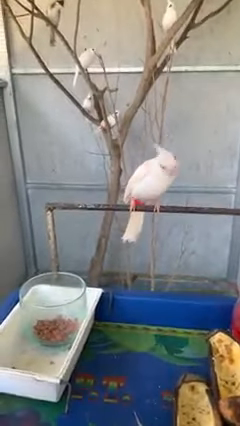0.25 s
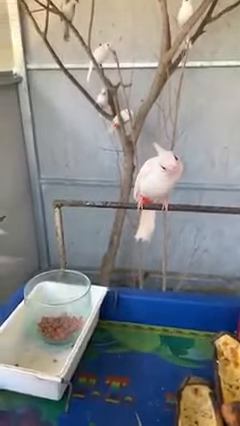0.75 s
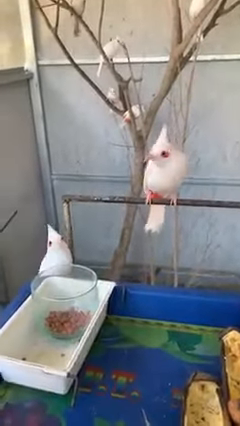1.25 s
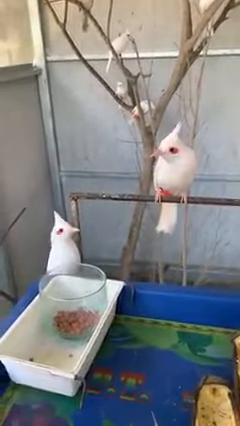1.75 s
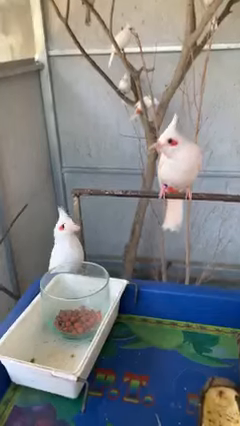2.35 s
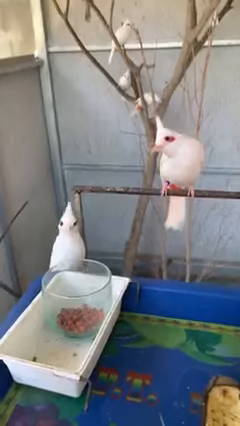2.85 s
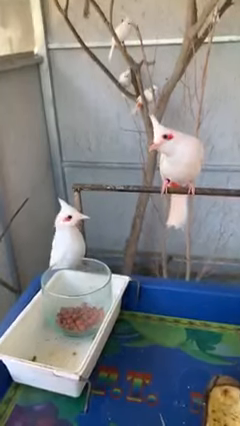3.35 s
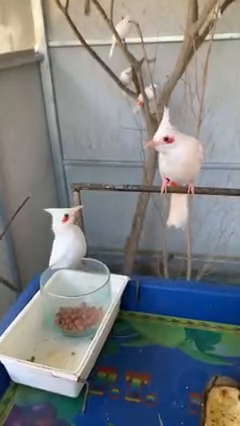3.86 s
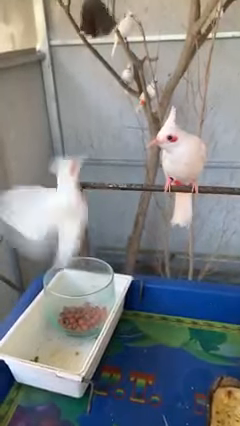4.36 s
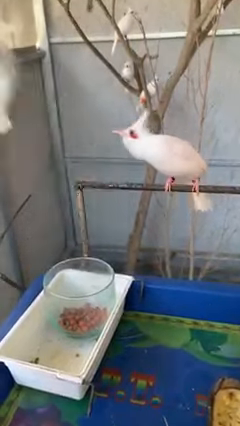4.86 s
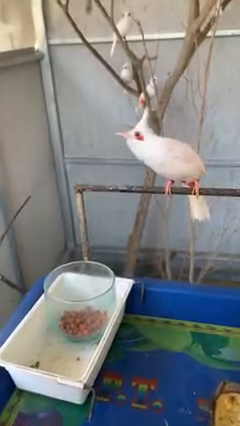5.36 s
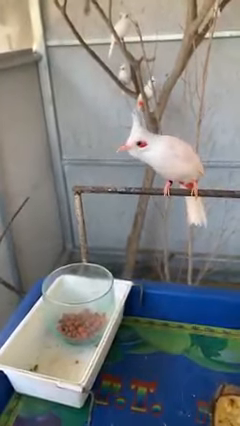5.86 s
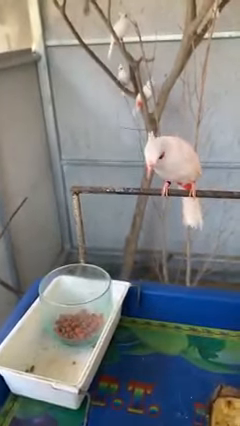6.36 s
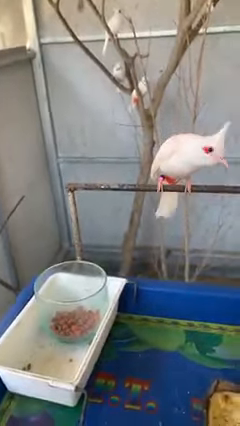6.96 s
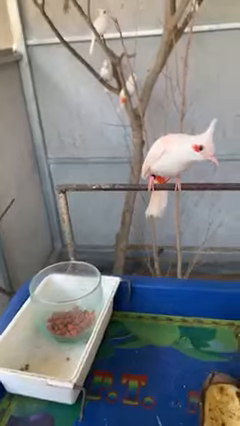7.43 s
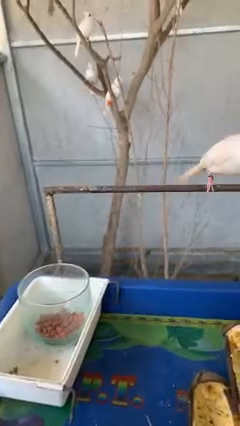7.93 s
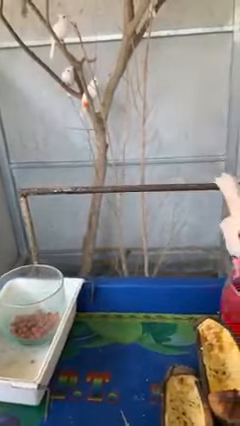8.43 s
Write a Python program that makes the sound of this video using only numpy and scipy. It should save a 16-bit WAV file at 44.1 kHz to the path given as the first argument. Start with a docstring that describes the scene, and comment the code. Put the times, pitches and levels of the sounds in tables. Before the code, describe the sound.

Close to the microphone in a small aviary, songbirds trade short gliding whistles, hoarse chirps and brief scolding runs over fainter flock chatter. A sharp, buzzy call cuts through near the start, and the loudest ones come just past halfway. Soft feather rustles come and go, and a few quick taps on a dish arrive at the end. The walls add a brief echo, with low outside rumble and hand noise underneath.

```python
"""Bulbuls chirp, rasp and chatter in a small hard-walled aviary, close to a pair of microphones.
Each note is a gliding whistle, roughened by fast modulation of its frequency and amplitude;
reflection from the walls returns it as a short bright ring. Feathers rustle, a bird taps the dishes
near the end, and low rumble comes from outside and from the hand that holds the recorder."""
import sys
import numpy as np
from scipy import signal
from scipy.fft import rfft, irfft, next_fast_len
from scipy.io import wavfile
from scipy.ndimage import uniform_filter1d

SR = 44100
rng = np.random.default_rng(int(sys.argv[2]) if len(sys.argv) > 2 else 0)


def waveform_to_disk(signal):
    """Save audio, clipped to [-1, 1], as 16-bit WAV at the path in sys.argv[1]."""
    frames = np.transpose(np.atleast_2d(signal))
    scaled = np.clip(frames, -1, 1) * 32767
    samples = np.round(scaled).astype(np.int16)
    wavfile.write(sys.argv[1], SR, samples)


N = 383229

# Loud buzzing calls, one list each. Each row: time in seconds, pitch in Hz, level in dB, buzz 0 to 1.
LOUD_CALLS = [
    [(1.071, 3125, -40.5, 1), (1.085, 3250, -28.5, 1), (1.089, 3490, -13, 1), (1.127, 3636, -14, 1),
     (1.132, 3700, -20, 0.9), (1.158, 3960, -21.5, 1), (1.178, 3630, -49, 0.7)],
    [(4.79, 3040, -48, 0.85), (4.804, 3220, -28, 0.55), (4.811, 3467, -13, 0.99), (4.832, 3640, -8.5, 0.77),
     (4.837, 3765, -21, 0.5), (4.878, 4160, -26.5, 1), (4.892, 3800, -45, 1)],
    [(5.526, 3132, -39, 1), (5.548, 3340, -21, 0.9), (5.586, 3575, -19, 0.74), (5.608, 3850, -19, 1),
     (5.635, 3840, -25, 0.8)],
    [(5.61, 3260, -33.5, 1), (5.633, 3400, -16, 1), (5.65, 3186, -16.5, 0.74), (5.678, 3540, -15.5, 1),
     (5.695, 3896, -21, 1), (5.722, 4090, -31, 0.9)],
    [(7.415, 3120, -32.5, 1), (7.427, 3378, -28, 0.93), (7.445, 3505, -24, 0.98), (7.475, 3140, -25, 0.6),
     (7.51, 2895, -21.5, 0.3), (7.535, 2846, -21.5, 0.2), (7.548, 2860, -33, 0.1)],
    [(7.568, 2843, -34, 0.94), (7.582, 2956, -33, 1), (7.605, 3407, -30.5, 0.92), (7.64, 2903, -33, 0.6),
     (7.666, 2720, -47, 0.4)],
]
# Overtones against effort. Each row: call level, second harmonic, third harmonic, all in dB.
CALL_OVERTONES = [(-28.5, -27.5, -34), (-28, -25, -31), (-9.5, -23.5, -17)]
# A falling note, then a pure held one. Each row: start in seconds, upper and held pitch in Hz,
# held length in seconds, upper and held level in dB.
TEE_OO_CALLS = [(2.49, 2856, 2590, 0.07, -38, -43.5), (3.121, 2910, 2553, 0.037, -35.5, -34.5),
                (3.436, 2860, 2550, 0.044, -30.5, -38.5), (3.87, 2913, 2640, 0.046, -31, -35),
                (5.42, 2776, 2584, 0.02, -35, -35), (6.352, 3270, 2910, 0.014, -38, -30.5)]
# Burry whistles with a low grace note. Each row: start and length in seconds, pitch in Hz, level in dB.
TO_WEE_CALLS = [(3.541, 0.055, 2184, -41.5), (3.983, 0.056, 2255, -42.5), (6, 0.11, 2350, -32.5)]
# Clear whistles and harsh rasps. Each row: start and length in seconds, pitch in Hz, level in dB.
WHISTLE_NOTES = [(0.229, 0.17, 3043, -57), (1.164, 0.07, 2490, -39.5), (1.385, 0.064, 3580, -42.5),
                 (1.461, 0.039, 3514, -42.5), (2.003, 0.035, 3290, -45), (2.097, 0.033, 4010, -39),
                 (2.181, 0.03, 3950, -40.5), (2.75, 0.053, 2070, -42.5), (2.929, 0.026, 3320, -34.5),
                 (2.946, 0.026, 2690, -38.5), (3.271, 0.077, 2170, -43.5), (3.29, 0.035, 3465, -47.5),
                 (3.349, 0.042, 2910, -38), (3.38, 0.0586, 1763, -43), (3.698, 0.069, 2144, -44.5),
                 (3.819, 0.045, 1706, -40.5), (4.134, 0.077, 2425, -43), (4.146, 0.033, 2063, -39.5),
                 (4.291, 0.034, 1717, -42), (4.702, 0.16, 3650, -44), (5.003, 0.076, 2401, -36.5),
                 (5.053, 0.05, 3280, -33), (5.234, 0.089, 2328, -42), (5.456, 0.06, 2132, -41.5),
                 (5.762, 0.051, 2900, -32), (5.797, 0.026, 2888, -24.5), (6.242, 0.036, 2260, -40),
                 (6.393, .026, 2710, -38), (6.441, 0.027, 3340, -35), (6.425, 0.038, 3930, -40.5),
                 (6.994, .036, 2863, -26), (7.103, 0.07, 2230, -41.5), (7.548, 0.023, 2796, -28.5),
                 (8.055, 0.019, 2146, -37.5), (8.076, 0.022, 2187, -30.5), (8.6, 0.036, 2683, -37),
                 (8.654, 0.026, 2130, -41.5)]
RASP_NOTES = [(0.388, 0.17, 1910, -59.5), (1.547, 0.046, 3114, -38), (1.643, 0.034, 2733, -40),
              (1.713, 0.086, 3270, -42), (1.835, 0.059, 3390, -40.5), (1.96, 0.046, 3360, -40.5),
              (2.094, 0.071, 2847, -46), (5.813, 0.0402, 2947, -31.5), (6.039, 0.17, 2888, -44.5)]
# Slurs. Each row: start and length in seconds, middle pitch in Hz, level in dB, rasp 0 to 1.
RISING_SLURS = [(0.55, 0.048, 3310, -36, 0.64), (0.667, 0.055, 2735, -35.5, 0.51),
                (2.314, 0.043, 3480, -39, 0.91), (2.613, 0.042, 1705, -47, 0.39),
                (2.642, 0.018, 2940, -34.5, 0.83), (3.129, .035, 1745, -53, .6),
                (3.227, 0.072, 2890, -37.5, 0.25), (3.708, 0.037, 3220, -38.5, 0.62),
                (3.907, 0.058, 3640, -44, 0.95), (4.168, 0.035, 3200, -37.5, 0.29),
                (4.476, 0.013, 3080, -27.5, 0.28), (4.616, 0.11, 2237, -44, 0.81),
                (4.689, 0.026, 2930, -32.5, 0.22), (6.027, 0.058, 3125, -35, 0.19),
                (5.717, 0.078, 1810, -47, 0.2), (5.856, 0.037, 2550, -30, 0.39),
                (8.507, 0.043, 1245, -46, 0.29), (8.543, 0.086, 1600, -42.5, 0.55)]
FALLING_SLURS = [(0.716, 0.061, 3190, -40.5, 0.31), (1.236, 0.099, 2540, -44.5, 0.79),
                 (2.785, .07, 3090, -30, 0.53), (2.858, 0.069, 2388, -39.5, 0.33),
                 (3.293, 0.052, 2960, -39.5, 0.15), (1.567, 0.081, 2500, -45.5, .5),
                 (3.683, 0.052, 2430, -40.5, 0.71), (4.271, 0.066, 2274, -46.5, 0.58),
                 (6.11, 0.081, 1988, -37.5, 0.41), (6.563, 0.063, 1928, -45, 0.5),
                 (6.719, 0.06, 2910, -38, 0.62), (6.817, 0.052, 3205, -34, 0.39)]
# Scolding runs. Each row: start and syllable spacing in seconds, top pitch in Hz, level in dB.
CHATTER_RUNS = [(2.172, 0.044, 1691, -41), (4.331, 0.047, 1637, -42), (6.612, .047, 1695, -39.5)]
# Pitch contours. Each pair: start and end pitch as shares of the middle pitch.
STEADY, LIFT, DROOP = (1, 1), (.95, 1.015), (1, .98)
RISE, FALL, ARCH = (.83, 1.1), (1.09, .9), (.74, .77)
# Impacts of beak, feet and wings. Each row: start in seconds, ring level in dB, ring frequency in Hz,
# time to decay by 60 dB in seconds, click level in dB.
IMPACTS = [(1.047, -36, 410, 0.019, -77), (3.439, -49, 10480, 0.048, -70), (4.795, -44, 156, 0.2, -108),
           (6.152, -40.5, 490, 0.02, -99), (7.677, -39.5, 338, 0.035, -76), (8.379, -38, 10820, 0.075, -41),
           (8.417, -23.5, 3920, 0.025, -28.5), (8.46, -35, 1350, 0.023, -41.5),
           (8.481, -40, 1600, 0.019, -64)]
# Bouts of rustling and of hand rumble. Each row: start and length in seconds, level in dB.
RUSTLE_BOUTS = [(0.17, 0.11, -61), (0.382, 0.22, -54), (0.56, 0.27, -50), (2.99, 0.27, -60.5),
                (3.684, 0.42, -57.5), (3.947, 0.37, -56), (4.225, 0.28, -56), (4.712, 0.13, -50.5),
                (4.976, 0.23, -56), (5.223, 0.17, -51.5), (6.08, 0.17, -58), (6.7, 0.24, -66),
                (7.812, 0.071, -59)]
HAND_BOUTS = [(0, 0.12, -43), (0.536, 0.3, -48), (1.2, 0.33, -44.5), (3.79, 0.45, -49), (4.684, 0.25, -47),
              (7.45, 0.81, -54.5)]
# Strength of the flock's notes and the outside rumble. Each row: time in seconds, level in dB.
FLOCK_LEVELS = [(0, -80), (.4, -57), (.8, -58.5), (1.0, -69), (1.6, -55.5), (4.6, -57.5), (4.95, -54.5),
                (5.5, -53.5), (7.3, -54.5), (8.0, -57.5), (8.69, -63)]
RUMBLE_LEVELS = [(0.0, -48), (3.73, -49.5), (3.92, -47), (5.64, -51), (8.69, -47.5)]
# Tone colour of the birds' calls as the microphones hear them. Each row: frequency in Hz, gain in dB.
CALL_COLOUR = [(900, -1), (1400, 5.5), (3800, -2.5), (4400, -9.5), (5200, 0.5), (5800, -3.5), (8500, -15),
               (10000, -4), (11500, -7.5), (13000, -11.5), (16000, -14.5)]
# Resonance of the wide-open beak in loud calls. Each row: frequency in Hz, gain in dB.
OPEN_BEAK_RESPONSE = [(7500, 1), (10000, -1), (11200, 2.5), (12200, 2), (14000, 2)]
# Noise spectra. Each row: frequency in Hz, gain in dB.
FEATHER_SPECTRUM = [(700, -1), (2000, 6.5), (4500, -3.5), (6700, 11.5), (8300, 2.5), (10000, 7.5),
                    (12700, 1), (16000, -3.5)]
RUMBLE_SPECTRUM = [(22, -43), (50, 2), (140, -5.5), (330, -16.5), (570, -20.5), (820, -26.5), (1500, -26.5),
                   (3200, -38.5), (4600, -43), (6500, -42), (8500, -50), (10500, -50.5), (14500, -71.5)]
HAND_SPECTRUM = [(20, -27.5), (45, 4.5), (110, -7.5), (300, -16.5), (800, -44), (3000, -76)]
# Reverberation of the aviary. Each row: frequency in Hz, time to decay by 60 dB in seconds.
REVERB_TIMES = [(300, 0.19), (1500, 0.37), (3000, 0.36), (4200, 0.33), (10000, 0.26)]
# Response to the sum and the difference of left and right. Each row: frequency in Hz, gain in dB.
MID_RESPONSE = [(3900, 0), (4300, -8), (4650, -26.5), (5150, -14.5), (5700, 2.5), (6500, 3), (11500, 4),
                (12700, -14), (13700, 4)]
SIDE_RESPONSE = [(60, -1.5), (400, -0.5), (1300, -10), (2500, 4), (3600, -1), (4500, 6.5), (5600, 2),
                 (6700, -21.5), (8000, -7.5), (12600, 3), (14000, -21.5)]


def loud_calls(buzz_hz=235, depth=.79, swing_hz=280, grit_hz=200, under_db=-6, under_s=.011):
    """Modulation splits each sweep into fast pulses; greater effort strengthens the third harmonic."""
    beat = phase_of(buzz_hz * (1 + .26 * wander(200)))
    grit, hiss, out = wander(700), gain_of(-28) * turbulence(), np.zeros(N)
    effort_db, second_db, third_db = np.transpose(CALL_OVERTONES)
    for call in LOUD_CALLS:
        s, *controls = np.transpose(call)
        at = np.arange(int(s[0] * SR), int(s[-1] * SR))
        t = np.arange(len(at)) / SR
        hz, db, buzz = [np.interp(at / SR, s, control) for control in controls]
        phase = phase_of(hz + buzz * (swing_hz * np.sin(beat[at]) + grit_hz * grit[at]))
        second = gain_of(np.interp(db, effort_db, second_db)) * np.sin(2 * phase)
        third = gain_of(np.interp(db, effort_db, third_db)) * np.sin(3 * phase)
        lower_voice = gain_of(under_db) * np.exp(-t / under_s) * np.sin(phase * 2 / 3)
        voice = np.sin(phase) + second + buzz * (third + lower_voice + hiss[at])
        edges = np.minimum(np.minimum(t, t[-1] - t) / .004, 1)
        pulses = edges * np.exp(depth * buzz * np.cos(beat[at]))
        add(out, s[0], gain_of(db) * pulses * voice)
    echo = filtered(out, [(1, -8.5)], lag_s=.0041)  # from the wall behind the perch
    return filtered(filtered(out + echo, CALL_COLOUR), OPEN_BEAK_RESPONSE)


def syrinx(t, pitch, db, rasp, flutter, grit, air, swing_hz=300, grit_hz=230):
    """Flutter modulates a whistle, adding rough sidebands; low, raspy and loud notes are richer."""
    phase = phase_of(pitch + rasp * (swing_hz * flutter + grit_hz * grit))
    harsh = min(rasp, 1)
    tremolo = np.exp(.65 * harsh * flutter)
    attack_s = min(.022, .6 * t[-1]) + .1 * harsh * t[-1]
    ramp = np.clip(np.minimum(t / attack_s, (t[-1] - t) / .005), 0, 1)
    swell = np.sin(np.pi / 2 * ramp) ** 2
    second = gain_of(np.interp(pitch, [1700, 2200], [-6, -39 + 23 * harsh])) * np.sin(2 * phase)
    third = gain_of(np.interp(db, [-30, -15], [-39, -21])) * np.sin(3 * phase)
    subharmonic = gain_of(-21) * harsh ** 3 * np.interp(pitch, [2400, 2900], [0, 1]) * np.sin(phase / 2)
    hiss = gain_of(-21) * harsh * air
    return unit_rms(swell * tremolo * (np.sin(phase) + swell * (subharmonic + second + third) + hiss))


def turbulence():
    """Turbulent flow in the beak makes a treble hiss."""
    return unit_rms(filtered(rng.standard_normal(N), [(3000, -22.5), (6000, 5), (9000, 11.5), (15000, -3)]))


def short_notes(flutter_hz=200):
    """Level is a cue to distance: louder notes sound closer and drier, soft ones distant."""
    flutter = np.sin(phase_of(flutter_hz * (1 + .25 * wander(250))))
    grit, air = wander(1500), turbulence()
    near, far = np.zeros((2, N))
    for s, length, contour_hz, db, rasp in two_note_calls() + single_notes() + chatter() + flock():
        t = np.arange(int(length * SR)) / SR
        at = (round(s * SR) + np.arange(len(t))) % N
        pitch = np.polyval(np.polyfit([0, .5, 1], contour_hz, 2), t / t[-1])
        note = gain_of(db) * syrinx(t, pitch, db, rasp, flutter[at], grit[at], air[at])
        closeness = np.interp(db, [-30, -17], [.12, .93])
        add(near, s, np.sqrt(closeness) * note)
        add(far, s, np.sqrt(1 - closeness) * note)
    far = filtered(far, [(7000, .5), (10000, -12)])  # high overtones beam forward, missing the walls
    return filtered(near, CALL_COLOUR), filtered(far, CALL_COLOUR)


def glide(s, length, hz, db, rasp, bend):
    """A note's frequency glides through three pitches: start, middle and end."""
    return s, length, (bend[0] * hz, hz, bend[1] * hz), db, rasp


def two_note_calls(tee_s=.0239, grace_s=.0308, grace_hz=1687):
    """Two tones in quick succession form an interval: down in "tee-oo", up in "to-wee"."""
    notes = []
    for s, tee_hz, oo_hz, length, tee_db, oo_db in TEE_OO_CALLS:
        notes.append(glide(s, tee_s, tee_hz, tee_db, rasp=.27, bend=DROOP))
        notes.append(glide(s + .024, length, oo_hz, oo_db, rasp=.037, bend=STEADY))
    for s, length, hz, db in TO_WEE_CALLS:
        notes.append(glide(s, grace_s, grace_hz, db - 6, rasp=.43, bend=RISE))
        notes.append(glide(s + .0073, length, hz, db, rasp=.43, bend=LIFT))
    return notes


def single_notes():
    """Modulation depth and contour set whistles, slurs and rasps apart; strong whistles are purest."""
    notes = [glide(s, length, hz, db, rasp=np.interp(db, [-41, -28], [.26, .051]), bend=LIFT)
             for s, length, hz, db in WHISTLE_NOTES]
    notes += [glide(*row, bend=RISE) for row in RISING_SLURS]
    notes += [glide(*row, bend=FALL) for row in FALLING_SLURS]
    return notes + [glide(*row, rasp=1.305, bend=ARCH) for row in RASP_NOTES]


def chatter(syllables=6):
    """Nearly periodic repetition of arched notes makes a scold, the first one lower and softer."""
    notes = []
    for s, spacing, hz, db in CHATTER_RUNS:
        for k, (late, long, high, loud) in enumerate(rng.uniform(-1, 1, (syllables, 4))):
            start = s + (k + .12 * late) * spacing
            length = .725 * spacing * (1 + .25 * long)
            top_hz = hz * (.88 if k == 0 else 1) * (1 + .06 * high)
            level_db = db - (3 if k == 0 else 0) + 2 * loud
            notes.append(glide(start, length, top_hz, level_db, rasp=.52, bend=(.64, .735)))
    return notes


def taps(click_s=.0019, rise_s=.0014):
    """Each impact makes a brief click and excites one exponentially damped mode."""
    out, t = np.zeros(N), np.arange(SR // 4) / SR
    noise = rng.standard_normal((len(IMPACTS), len(t)))
    bursts = signal.lfilter(*signal.butter(1, [1100, 3000], "band", fs=SR), noise)
    for (s, db, hz, t60, click_db), burst in zip(IMPACTS, bursts):
        ring = gain_of(db - 60 * t / t60) * np.sin(2 * np.pi * hz * t)
        click = gain_of(click_db) * unit_rms(burst) * np.exp(-t / click_s)
        add(out, s, (ring + click) * np.minimum(t / rise_s, 1))
    return out


def feathers(shake_hz=24):
    """Friction between feathers makes a grainy hiss, modulated in amplitude by the shaking wings."""
    shake_db = 2.5 * np.sin(phase_of(shake_hz * (1 + .35 * wander(20))))
    hiss = filtered(rng.standard_normal(N), FEATHER_SPECTRUM)
    grain_db, stroke_db = 3 * wander(560), 3 * wander(45)
    return swells(RUSTLE_BOUTS, power=.7) * unit_rms(hiss * gain_of(grain_db + stroke_db + shake_db))


def flock(count=320, lowest_hz=1700, range_hz=2300, spread_db=5):
    """Superposition of faint, hoarse notes at random pitches gives a wash of distant chatter."""
    when, long, high, soft, rough = rng.random((count, 5)).T
    starts = (np.arange(count) + when) / count * N / SR
    hz = lowest_hz + range_hz * high
    db = np.interp(starts, *np.transpose(FLOCK_LEVELS)) - spread_db * soft
    return [glide(*row, bend=LIFT) for row in zip(starts, .046 * (1 + long), hz, db, (1 + rough) / 2)]


def outside(hum_hz=87):
    """Rumble, coherent at both microphones in the bass, and a wavering hum that swells for a while."""
    t = np.arange(N) / SR
    common, apart = rng.standard_normal((2, N))
    apart = filtered(apart, [(60, -38.5), (150, -27.5), (350, -10.5), (700, 3)])
    rumble = unit_rms(filtered(np.array([common + apart, common - apart]), RUMBLE_SPECTRUM))
    rumble_db = np.interp(t, *np.transpose(RUMBLE_LEVELS)) - 1.2
    hum = np.sin(phase_of(hum_hz + 4 * wander(15)))
    hum_db = 3 * wander(6) + np.interp(t, [.4, .7, 2.4, 2.9], [-62, -46, -46, -62])
    return gain_of(rumble_db) * rumble + gain_of(hum_db) * hum


def handling():
    """Structure-borne rumble from the hand reaches both microphones alike."""
    return swells(HAND_BOUTS) * unit_rms(filtered(rng.standard_normal(N), HAND_SPECTRUM))


def drone(start_s=7.25, end_s=8.33, hz=580, level_db=-61):
    """Random amplitude modulation makes a faint, distant tone unsteady."""
    t = np.arange(N) / SR
    gate = np.clip(np.minimum(t - start_s, end_s - t) * 20, 0, 1)
    return gain_of(level_db) * gate * wander(40) * np.sin(2 * np.pi * hz * t)


def aviary(x, direct_db, early_db, tail_db, early_s, count=12, right_lag_s=.000055):
    """Wall reflections follow the direct sound: early echoes, then a tail that decays band by band."""
    t = np.arange(SR * 2 // 3) / SR
    echoes = np.zeros((2, len(t)))
    arrival_s = .001008 + early_s * rng.random(count)
    sideways_s = .0002 * rng.uniform(-1, 1, count)  # each echo comes from its own direction
    strength = rng.choice([-1, 1], count) * gain_of(early_db) / np.sqrt(count)
    echoes[0, (SR * arrival_s).astype(int)] = strength
    echoes[1, (SR * (arrival_s + sideways_s)).astype(int)] = strength
    late = rng.standard_normal(echoes.shape) * (rng.random(echoes.shape) < 3000 / SR) * (t > .005)
    hz, frame_s, bands = signal.stft(late, SR, nperseg=256)
    decay = gain_of(-60 * frame_s / log_interp(REVERB_TIMES, hz)[:, None])
    tail = signal.istft(bands * decay, SR, nperseg=256)[1][:, :len(t)]
    tail *= gain_of(tail_db) / np.linalg.norm(tail, axis=1, keepdims=True)
    direct = gain_of(direct_db) * np.array([x, filtered(x, [(1, .056)], right_lag_s)])
    return direct + signal.fftconvolve(x[None], echoes + tail, axes=1)[:, :N]


def microphone_pair(x):
    """The ratio of difference to sum sets stereo width: wide near 5 kHz, narrow near 7 kHz."""
    mid = filtered((x[0] + x[1]) / 2, MID_RESPONSE)
    side = filtered((x[0] - x[1]) / 2, SIDE_RESPONSE)
    return np.array([mid + side, mid - side])


def gain_of(db):
    """Amplitude grows tenfold every 20 dB."""
    return 10 ** (np.asarray(db) / 20)


def unit_rms(x):
    """Division by the rms gives unit power."""
    return x / np.sqrt(np.mean(x ** 2) + 1e-20)


def phase_of(hz):
    """Phase is the time integral of frequency."""
    return 2 * np.pi * np.cumsum(hz) / SR


def log_interp(points, hz):
    """Interpolation joins points on a log-frequency axis."""
    knots_hz, values = np.transpose(points)
    return np.interp(np.log(hz + 1), np.log(knots_hz + 1), values)


def add(mix, s, sound):
    """A sound superposes on the mix from s seconds on."""
    part = mix[max(round(s * SR), 0):][:len(sound)]
    part += sound[:len(part)]


def swells(bouts, power=1):
    """Smooth humps, one a bout, sum to an amplitude envelope."""
    envelope = np.zeros(N)
    for s, length, db in bouts:
        add(envelope, s, gain_of(db) * np.hanning(int(length * SR)) ** power)
    return envelope


def filtered(x, points, lag_s=0):
    """A gain curve in dB shapes the spectrum; a linear phase shift delays it."""
    size = next_fast_len(N + 4096)
    hz = np.fft.rfftfreq(size, 1 / SR)
    response = gain_of(log_interp(points, hz)) * np.exp(-2j * np.pi * hz * lag_s)
    return irfft(rfft(x, size) * response, size)[..., :N]


def wander(rate_hz):
    """Interpolating rate_hz random values a second gives a fluctuation of rms 1."""
    return unit_rms(np.interp(np.arange(N) * rate_hz / SR, np.arange(N), rng.standard_normal(N)))


def scene():
    """The ratio of direct to reverberant sound falls with distance: far birds are wrapped in the room."""
    near, far = short_notes()
    loud = aviary(loud_calls(), direct_db=0, early_db=0, tail_db=-9.5, early_s=.011)
    close = aviary(near + feathers(), direct_db=-3.5, early_db=-4, tail_db=-9, early_s=.012)
    distant = aviary(far, direct_db=-6.5, early_db=-3, tail_db=-2.5, early_s=.02)
    knocks = aviary(taps(), direct_db=3, early_db=-.5, tail_db=-9, early_s=.0026)
    return microphone_pair(loud + close + distant + knocks + outside()) + drone() + handling()


def record(dry, threshold_db=-23, squeeze=.11, peak_fall_db_per_s=25, cutoff_hz=15850):
    """Compression lowers the gain briefly after the loudest calls; a low-pass filter limits the band."""
    power_db = 10 * np.log10(abs(uniform_filter1d((dry ** 2).mean(0), size=400)) + 1e-12)
    fall_db = np.arange(N) * peak_fall_db_per_s / SR
    peak_db = np.maximum.accumulate(power_db + fall_db) - fall_db
    over_db = np.maximum(peak_db - threshold_db, 0)
    ducked = dry / gain_of(squeeze * uniform_filter1d(over_db, size=200))
    low_pass = signal.firwin(511, cutoff_hz, window=("kaiser", 9), fs=SR)
    return signal.oaconvolve(ducked, low_pass[None], "same")


dry = scene()
out = record(dry)
waveform_to_disk(out)
```